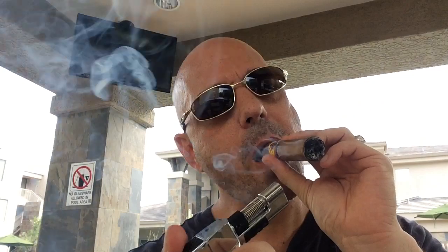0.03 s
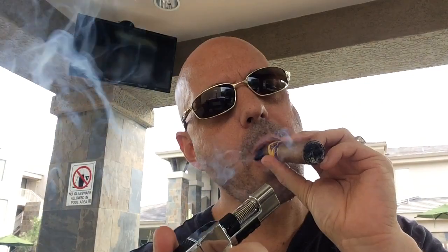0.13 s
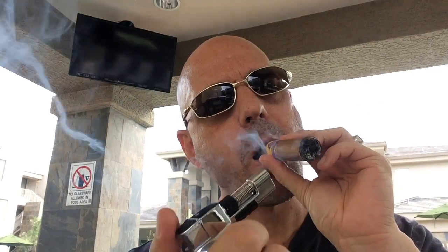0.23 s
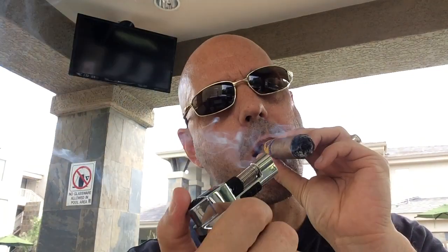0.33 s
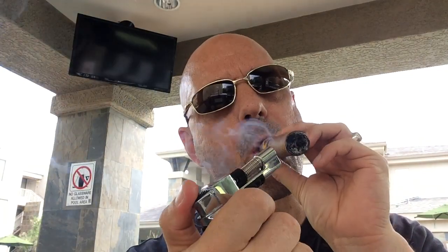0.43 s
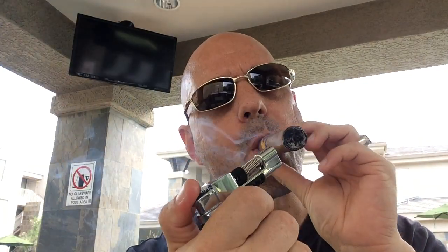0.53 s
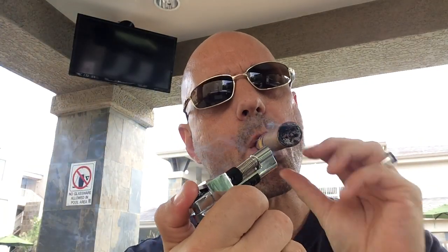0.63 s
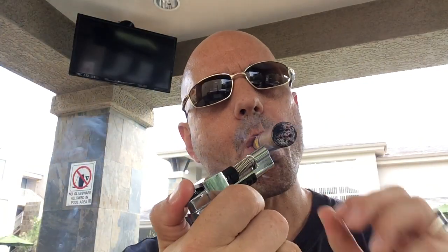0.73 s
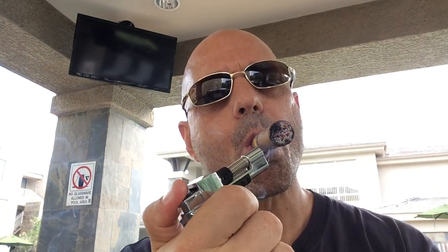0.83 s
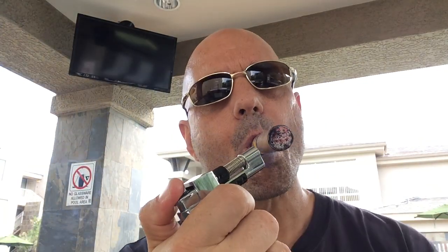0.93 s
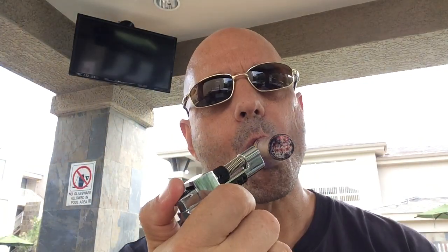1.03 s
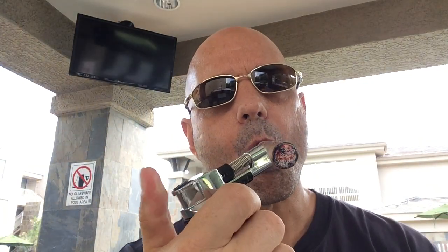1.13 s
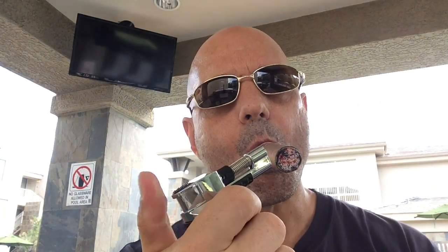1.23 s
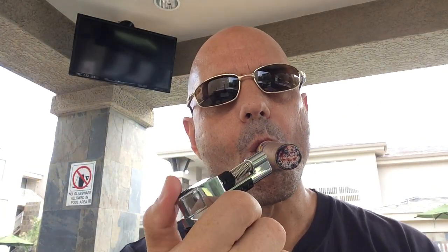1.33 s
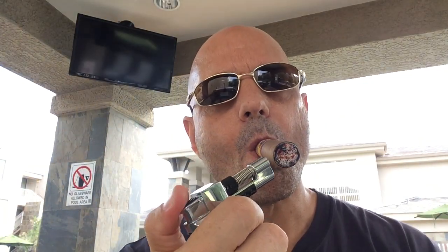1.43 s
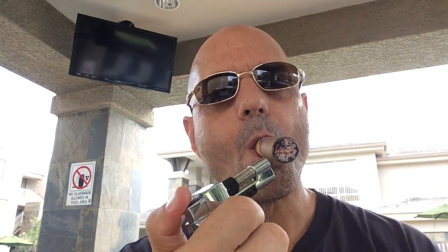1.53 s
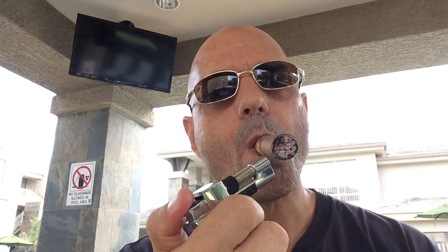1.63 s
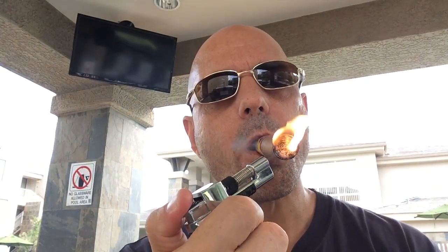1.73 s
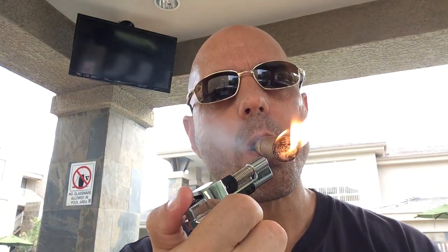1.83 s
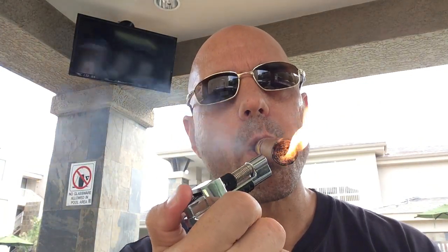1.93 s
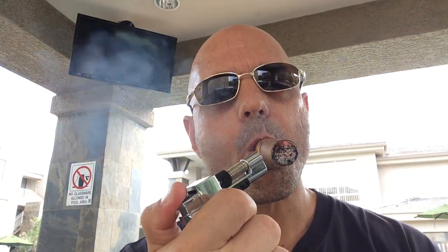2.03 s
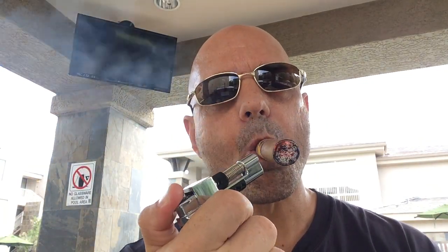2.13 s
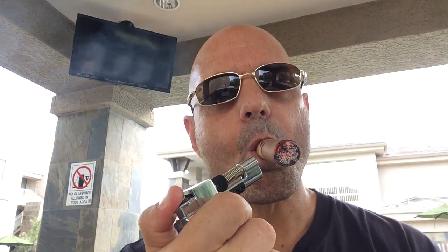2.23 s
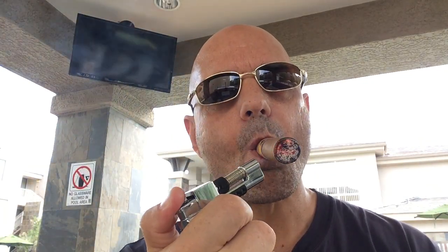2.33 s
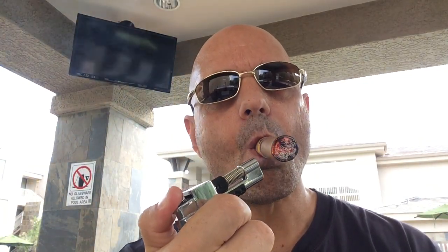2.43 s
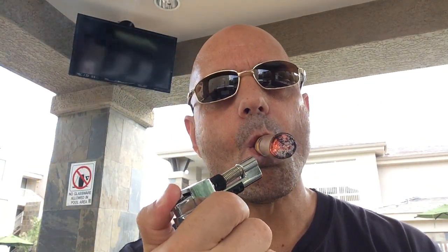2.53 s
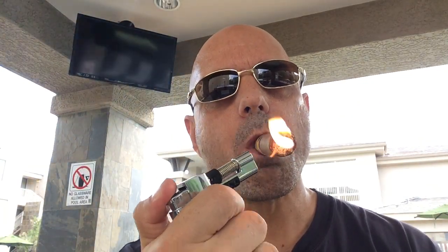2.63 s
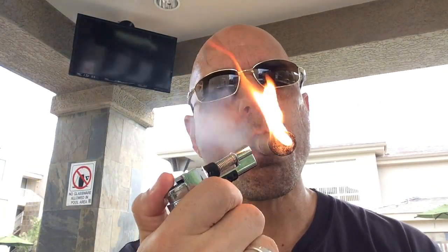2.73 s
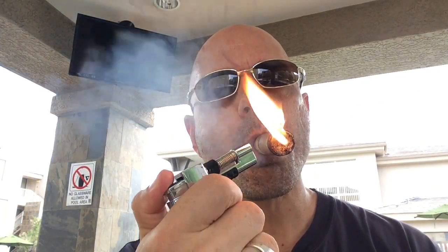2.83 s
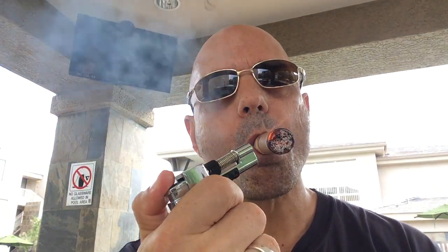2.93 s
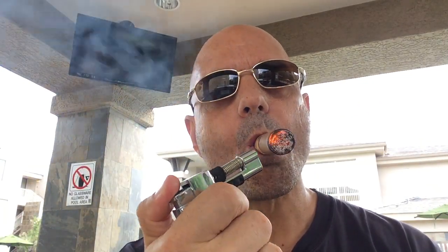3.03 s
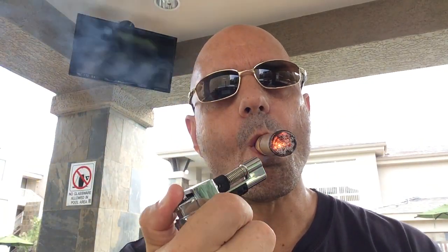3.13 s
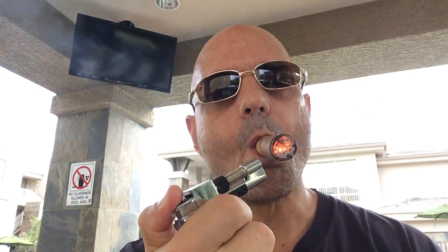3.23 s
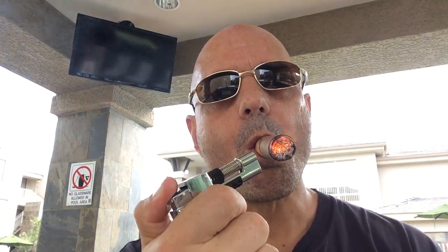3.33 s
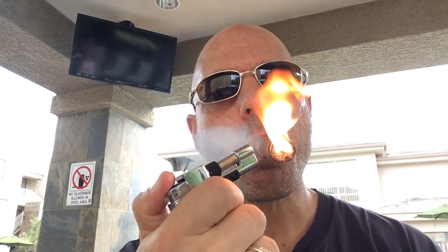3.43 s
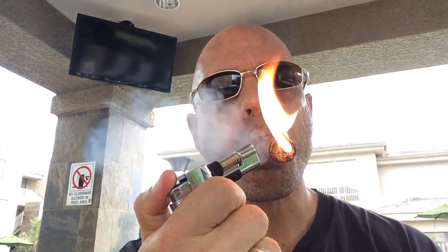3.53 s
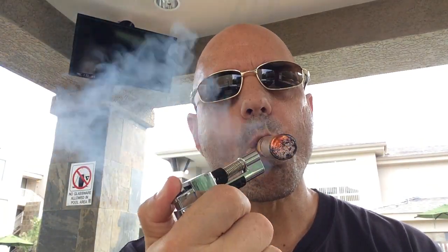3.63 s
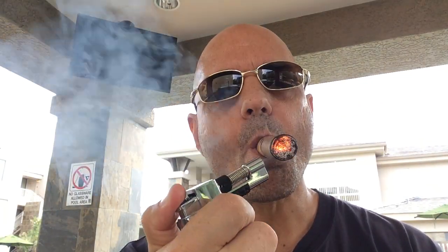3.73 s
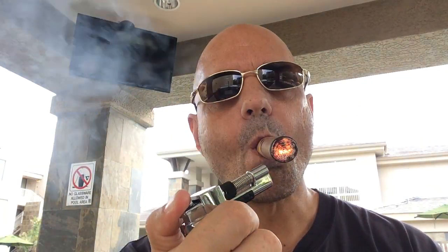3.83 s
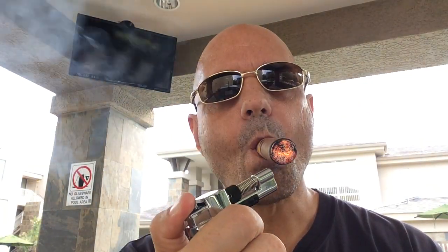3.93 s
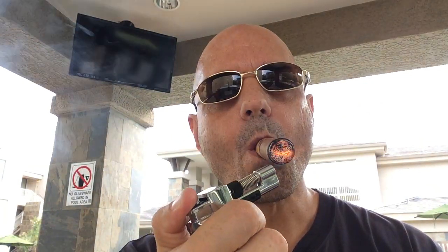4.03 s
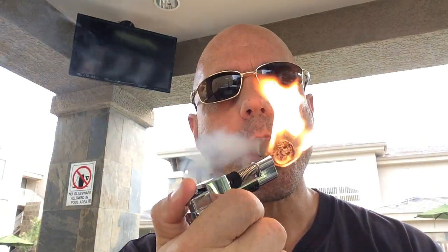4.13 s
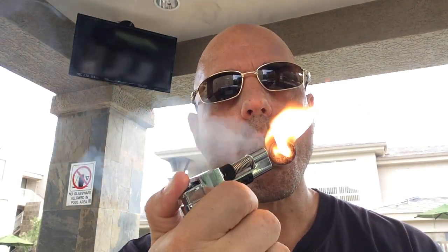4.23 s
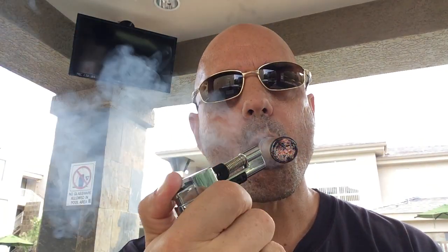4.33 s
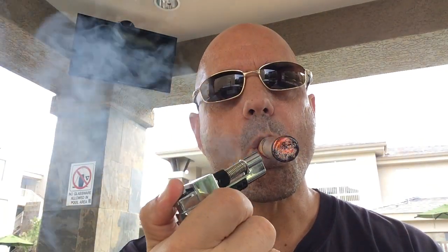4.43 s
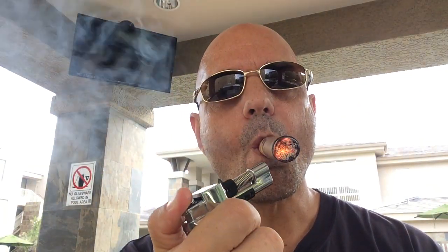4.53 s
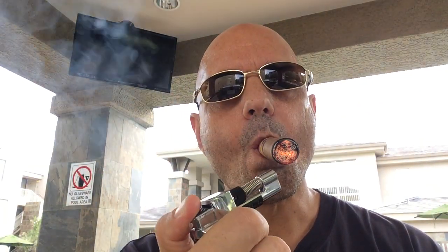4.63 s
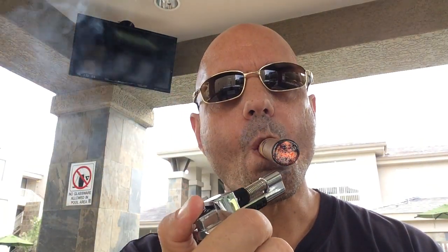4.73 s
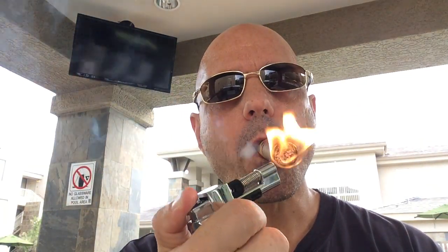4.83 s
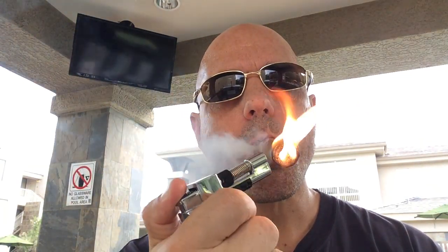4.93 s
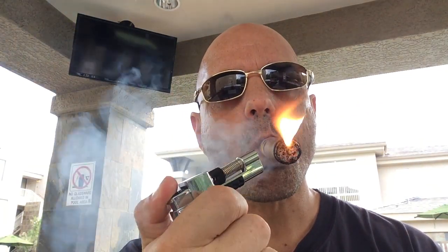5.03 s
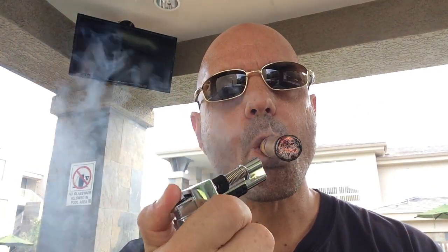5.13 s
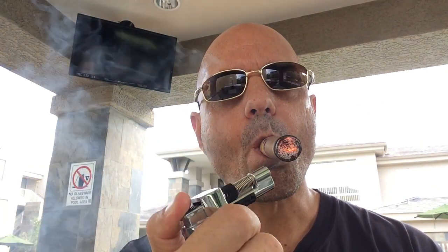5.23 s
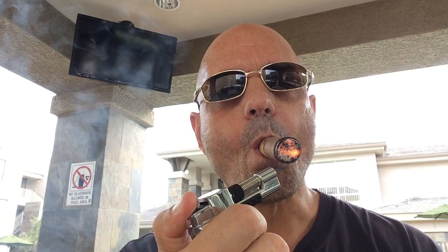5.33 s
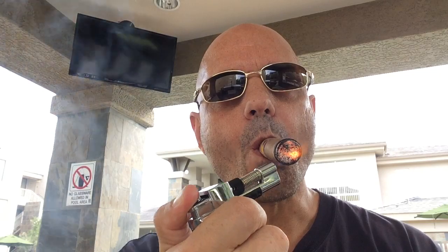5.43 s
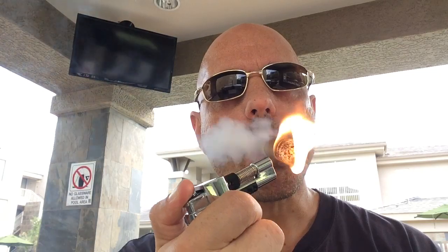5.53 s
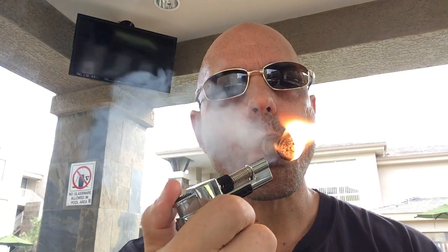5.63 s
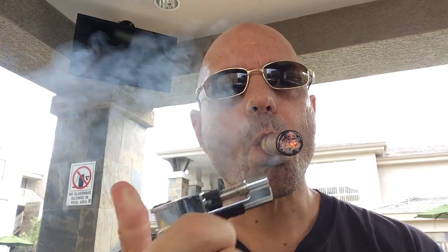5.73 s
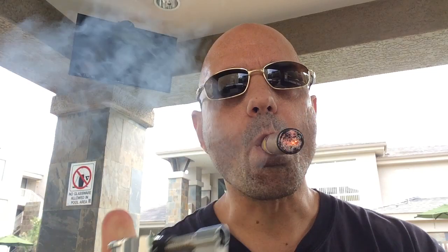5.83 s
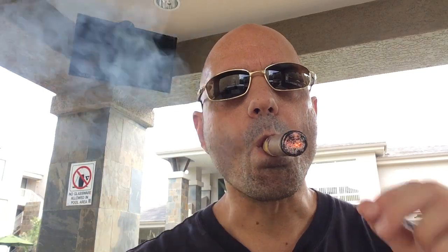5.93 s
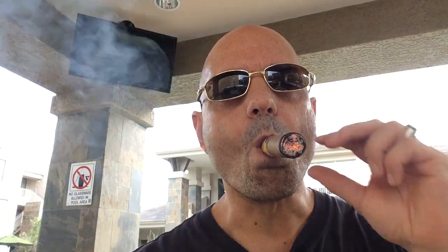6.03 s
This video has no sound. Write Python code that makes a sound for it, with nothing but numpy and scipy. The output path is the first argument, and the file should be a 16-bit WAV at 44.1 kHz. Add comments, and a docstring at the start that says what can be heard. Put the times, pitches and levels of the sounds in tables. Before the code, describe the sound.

Close to the microphone on a covered patio, a butane torch lighter hisses, snaps alight and clacks off after a short try. After a few light ticks it snaps again and burns for about four seconds with a wavering hiss and soft roar. Very deep, soft puffs of air hit the microphone as the cigar flares. A last clack stops the flame, while distant traffic rumbles faintly.

```python
"""Under a patio roof, a butane torch lighter lights a cigar: one short try, then a long burn.
Gas hisses as the trigger goes down, a tiny hammer snaps against a crystal to make the spark,
the flame roars, and the trigger clacks back. Each time the cigar flares up, a slow wave of
air pressure swings the microphone. Behind it, distant traffic rumbles, an engine idles,
a fan hums, and one far motor pulls and eases off."""
import sys
import numpy as np
from scipy import signal
from scipy.fft import rfft, irfft, next_fast_len
from scipy.io import wavfile
from scipy.ndimage import uniform_filter1d, map_coordinates

SR = 44100
rng = np.random.default_rng(int(sys.argv[2]) if len(sys.argv) > 2 else 0)


def dump(signal):
    """Clip the signal to [-1, 1] and save it as 16-bit WAV at the path in sys.argv[1]."""
    limited = np.clip(np.atleast_2d(signal).T, -1, 1)
    pcm = np.round(limited * 32767).astype(np.int16)
    wavfile.write(sys.argv[1], SR, pcm)


N = 268524


def amp(db):
    """Turn decibels into a gain to multiply by."""
    return 10 ** (np.asarray(db) / 20)


def unit(x):
    """Scale a signal to an average strength (rms) of 1."""
    return x / np.sqrt(np.mean(x ** 2) + 1e-20)


def along(points, hz):
    """Read between (frequency, value) points, on a log frequency axis."""
    freqs, values = np.transpose(points)
    return np.interp(np.log(hz + 1), np.log(freqs + 1), values)


def wobble(rate):
    """A smooth curve through `rate` random points a second."""
    return map_coordinates(rng.standard_normal(int(N * rate / SR) + 4), [np.arange(N) * rate / SR])


def swell(s, width):
    """A smooth bump of height 1 around s seconds."""
    return np.exp(-((np.arange(N) / SR - s) / width) ** 2 / 2)


def add(track, s, sound):
    """Mix a sound into the track at s seconds."""
    room = track[round(s * SR):][:len(sound)]
    room += sound[:len(room)]


def filtered(x, response):
    """Scale and delay each frequency in x as response(hz) says."""
    size = next_fast_len(len(x) + SR // 2)
    return irfft(rfft(x, size) * response(np.fft.rfftfreq(size, 1 / SR)), size)[:len(x)]


def rush(spectrum, patchy_db, size=512):
    """Rushing noise with loud and soft patches; a bigger size makes them narrower and slower."""
    frames = signal.stft(rng.standard_normal(N), nperseg=size)[2]
    patches = uniform_filter1d(rng.standard_normal(frames.shape), size=4, axis=0)
    patches = uniform_filter1d(patches, size=8, axis=1)
    noise = signal.istft(frames * amp(patchy_db * unit(patches)), nperseg=size)[1][:N]
    return unit(filtered(noise, lambda hz: amp(along(spectrum, hz))))


def whistle(hz, width_hz):
    """A breathy note: a narrow band of noise whose pitch may move."""
    phase = 2 * np.pi * np.cumsum(hz * np.ones(N)) / SR
    smooth = signal.butter(2, width_hz / 2, fs=SR, output="sos")
    a, b = signal.sosfilt(smooth, rng.standard_normal((2, N)))
    return unit(a * np.cos(phase) + b * np.sin(phase))


# the tone of the deep rumble and of the tyres: (frequency [Hz], relative level [dB])
RUMBLE_TONE = [(20, -2.5), (35, 6), (50, -7.5), (63, -5), (74, 1), (100, -9.5), (120, -6.5), (160, -19),
               (300, -51.5)]
TYRE_TONE = [(80, 0), (120, 0.5), (170, -3.5), (210, -2.5), (340, -1), (450, -4), (650, -7.5),
             (1000, -13.5), (1600, -18.5), (2500, -25), (5000, -30.5), (10000, -37), (15000, -52)]
# engines and tyres droning further off: (time [s], pitch [Hz], level [dB])
DRONE = [(0, 245, -65), (1.6, 238, -69.5), (2.7, 205, -64.5), (3.699, 208, -61), (4.4, 245, -67.5),
         (5.199, 290, -60.5), (6.09, 250, -63)]

def traffic(rumble_db=-50.5, tyres_db=-55.5, rise_db_per_s=.24):
    """Far traffic rumbles and drones; the tyres grow louder as it slowly draws nearer."""
    t = np.arange(N) / SR
    times, drone_hz, drone_db = np.transpose(DRONE)
    rumble = amp(rumble_db + .61 * wobble(2.3)) * rush(RUMBLE_TONE, patchy_db=-1)
    tyre_gain = amp(tyres_db + rise_db_per_s * t + .51 * wobble(2.8))
    tyres = tyre_gain * rush(TYRE_TONE, patchy_db=2, size=4096)
    drone = amp(np.interp(t, times, drone_db)) * whistle(np.interp(t, times, drone_hz), width_hz=43)
    return rumble + tyres + drone


# the idling engine gets louder: (time [s], level [dB], width [s])
IDLE_SWELLS = [(1.62, -52, .26), (2.3, -53, .33), (3.152, -58.5, 0.28), (4.27, -52.5, .22)]

def idling_engine():
    """An engine down the street hums low, swelling and fading."""
    gain = sum(amp(db) * swell(s, width) for s, db, width in IDLE_SWELLS)
    return gain * whistle(hz=73, width_hz=18.3)


def fan():
    """A fan gives a faint steady note over the low hum of its mains power."""
    return amp(-72) * whistle(hz=592, width_hz=9) + amp(-66) * whistle(hz=119, width_hz=8.6)


def motor(pull_s=.93, ease_s=1.27, throttle_s=.03, top_hz=262, climb_hz_per_s=8, sag_hz_per_s=60,
          base_db=-64, pull_db=8.5, fade_db_per_s=5):
    """A far motor's note climbs until the throttle eases, then sags; it is loudest while it pulls."""
    t = np.arange(N) / SR
    before, after = np.maximum(ease_s - t, 0), np.maximum(t - ease_s, 0)
    pitch = top_hz - climb_hz_per_s * before - sag_hz_per_s * after + 2 * wobble(15)
    pull = np.interp(t, [pull_s - throttle_s, pull_s, ease_s, ease_s + throttle_s], [0, 1, 1, 0])
    level_db = base_db + pull_db * pull - fade_db_per_s * np.abs(t - pull_s) + 2 * wobble(11)
    return amp(level_db) * np.sqrt(2) * np.sin(2 * np.pi * np.cumsum(pitch) / SR)


# how long the patio rings: (frequency [Hz], time to fade by 60 dB [s])
PATIO_FADE = [(300, 0.19), (3000, 0.24), (8000, 0.19), (15000, 0.21)]
# echoes off the pillars and roof: (delay [s], relative level [dB])
ECHOES = [(.0075, -38), (0.011, -27.5), (0.015, -25), (0.019, -40.5), (0.0277, -39.5)]
# the tone of a hard click, heard from all sides: (frequency [Hz], relative level [dB])
CLICK_TONE = [(100, -33.5), (600, -18), (1100, -8.5), (1500, 2.5), (2000, -1), (2550, -9.5), (3200, 3.5),
              (5000, -3), (7000, 3), (12000, -1.5), (15000, -6.5)]

def patio(tail_db, echo_db):
    """The patio answers a click with a few hard echoes and a short, blurred tail."""
    hz, t, frames = signal.stft(rng.standard_normal(SR // 2), SR, nperseg=256)
    tail = signal.istft(frames * amp(-60 * t / along(PATIO_FADE, hz)[:, None]), SR, nperseg=256)[1]
    answer = amp(tail_db) * tail / np.linalg.norm(tail)
    for delay, db in ECHOES:
        echo = rng.standard_normal(len(tail)) * amp(-60 * np.arange(len(tail)) / SR / .0067)
        add(answer, delay, amp(db + echo_db) * echo / np.linalg.norm(echo))
    return filtered(answer, lambda hz: amp(along(CLICK_TONE, hz)))


# the cigar flares up, and the nozzle's ring may dip as the torch tilts:
# (time [s], level [dB], width [s], time until collapse [s], pitch dip [Hz])
FLARES = [(1.872, -17.5, .036, .243, 0), (2.787, -7.5, .028, .198, 100), (3.511, -12.5, .028, .179, 0),
          (4.245, -15, .04, .16, 420), (4.982, -11, .028, .168, 480), (5.618, -11.5, .028, .172, 400)]

def flares(collapse_width_s=.057, collapse_db=2.03, lead_widths=2.6, onset_s=.03, leak_hz=.68):
    """Each flare catches suddenly and draws the air away; its slower collapse pushes air back."""
    t, pressure = np.arange(N) / SR, np.zeros(N)
    for s, db, width, life, _ in FLARES:
        caught = np.sin(np.pi / 2 * np.clip((t - s + lead_widths * width) / onset_s, 0, 1)) ** 2
        collapse = amp(collapse_db) * width / collapse_width_s * swell(s + life, collapse_width_s)
        pressure += amp(db) * caught * (collapse - swell(s, width))
    pressure *= 1 + amp(-36) * wobble(67)  # a slight flutter
    # the microphone lets steady pressure leak away
    return filtered(pressure, lambda hz: 1j * hz / (leak_hz + 1j * hz))


def strike(notes, rattle_s, rattle_db):
    """One hard hit and its dying rattle make a part ring at its own notes."""
    t = np.arange(SR // 2) / SR
    rattle = rng.standard_normal(len(t)) * amp(-60 * t / rattle_s)
    force = amp(rattle_db) * rattle / np.linalg.norm(rattle)
    force[0] = 1  # the hit itself
    # so short a contact holds all frequencies evenly
    force = irfft(np.exp(1j * np.angle(rfft(force))), len(t))
    force *= np.exp(-(2 * t / rattle_s) ** 2)

    def body(hz):
        return sum((-1) ** k * amp(db) * 1j * hz * width / (pitch ** 2 - hz ** 2 + 1j * hz * width)
                   for k, (pitch, width, db) in enumerate(notes))

    ring = filtered(force, body)
    return ring / np.linalg.norm(ring)


# the notes of the trigger hitting its stop: (pitch [Hz], width [Hz], relative level [dB])
TRIGGER_NOTES = [(716, 380, -16), (1150, 250, -19.5), (1410, 590, -6), (1970, 500, -5.5), (3170, 810, -8.5),
                 (4300, 630, -7.5), (5990, 420, 4.5), (6870, 200, -35), (7850, 160, -2.5),
                 (9880, 360, -3.5), (11140, 350, 4.5), (12300, 300, -9), (12800, 430, -12)]
# the spring's faint ring: (pitch [Hz], relative level [dB], time to fade by 60 dB [s])
SPRING_NOTES = [(8170, -43, .21), (11080, -41, .08)]
# the trigger springs back or is touched:
# (time [s], relative level [dB], rattle length [s], low cutoff [Hz])
CLACKS = [(0.4786, -53, .02, 4500), (1.1668, -50, 0.011, 2970), (1.1965, -8.5, 0.011, 452),
          (1.3729, -24, .013, 4500), (1.383, -36.5, 0.017, 1990), (1.4050, -42, 0.014, 2030),
          (1.4570, -55, 0.021, 4500), (1.6467, -37, .005, 4500), (3.054, -50, .012, 1970),
          (5.715, -46, .012, 2000), (5.753, -9, 0.014, 780)]

def trigger(gain_db=9, full_shake_s=.017):
    """The trigger meets its stop and shakes its spring; light touches stir only the high notes."""
    out, t = np.zeros(N), np.arange(SR // 2) / SR
    spring = sum(amp(db - 60 * t / fade_s) * np.sin(2 * np.pi * hz * t)
                 for hz, db, fade_s in SPRING_NOTES)
    for s, db, rattle_s, low_hz in CLACKS:
        clack = strike(TRIGGER_NOTES, rattle_s, rattle_db=6)
        add(clack, 0, patio(tail_db=-19.5, echo_db=.5))
        clack = signal.sosfilt(signal.butter(4, low_hz, "high", fs=SR, output="sos"), clack)
        shake = min(rattle_s / full_shake_s, 1) ** 2  # a short rattle barely stirs the spring
        add(out, s, amp(db + gain_db) * clack + amp(db) * shake * spring)
    return out


# the notes of the lighter's case: (pitch [Hz], width [Hz], relative level [dB])
CASE_NOTES = [(690, 140, -19.5), (1600, 260, -6.5), (3390, 280, 3), (4465, 410, -1.5), (6430, 410, .7),
              (7100, 310, -3), (8970, 540, -3.5), (10600, 450, -1), (11900, 550, -2), (11700, 290, -3.5),
              (12810, 690, 0)]
# the hammer snaps: (time [s], relative level [dB], rattle length [s], knock level [dB])
SNAPS = [(0.699, -3, 0.0088, -37.5), (1.649, -3, 0.0044, -32)]

def hammer(gain_db=9, knock_hz=140, knock_fade_s=.029):
    """The hammer hits the spark crystal, rings the case and knocks it against the hand."""
    out, t = np.zeros(N), np.arange(SR // 4) / SR
    for s, db, rattle_s, knock_db in SNAPS:
        add(out, s, amp(db + gain_db) * strike(CASE_NOTES, rattle_s, rattle_db=1))
        add(out, s, amp(db + gain_db) * patio(tail_db=-17, echo_db=2))
        add(out, s, amp(knock_db - 60 * t / knock_fade_s) * np.sin(2 * np.pi * knock_hz * t))
    return out


# the tone of rushing gas: (frequency [Hz], relative level [dB])
HISS_TONE = [(1200, -29), (2600, -8), (4000, -8), (5000, -11), (6300, -11.5), (8200, -12.5), (9800, -8),
             (10400, -3.5), (11100, -3), (12200, -5.5), (13000, -8), (13700, -10.5), (14200, -23)]

def gas_hiss(flow, ring_hz=9070, barrel_hz=4620, nozzle_hz=10700, tilt_width_s=.097):
    """Gas hisses, and sings in the nozzle and barrel; tilting lowers the ring and softens the hiss."""
    warming_db = 1.4 * np.arange(N) / SR  # the nozzle sings louder as the torch warms up
    dip_hz = sum(depth_hz * swell(s, tilt_width_s) for s, *_, depth_hz in FLARES)
    ring = amp(-7 + .95 * wobble(5)) * whistle(ring_hz - dip_hz, width_hz=530)
    barrel = amp(-9.5 + 1.2 * wobble(4.5)) * whistle(barrel_hz, width_hz=260)
    nozzle = amp(-9 + warming_db + .8 * wobble(5.5)) * whistle(nozzle_hz, width_hz=660)
    hiss = rush(HISS_TONE, patchy_db=-.5, size=1024)
    return amp(-2.5 + .51 * flow - .002 * dip_hz) * (hiss + ring + barrel + nozzle)


# the tone of the flame: (frequency [Hz], relative level [dB])
ROAR_TONE = [(100, -13.5), (300, -3), (420, -2.5), (600, 3), (950, -0.5), (1400, 2.5), (1900, -2.5),
             (2200, -6), (2500, -30), (4000, -22)]

def flame_roar(flow):
    """The swirling jet of flame roars lower than the hiss and flickers quickly."""
    return amp(.53 * flow + .77 * wobble(40)) * rush(ROAR_TONE, patchy_db=2, size=4096)


def held(start, stop, rise_s, weak_db, settle_s=.45, shut_db_per_s=400):
    """The gain of a flow that starts weak, settles, and dies as the valve springs shut."""
    t = np.arange(N) / SR
    age, since_shut = np.maximum(t - start, 0), np.maximum(t - stop, 0)
    opening = np.minimum(age / rise_s, 1)
    return opening * amp(-weak_db * np.exp(-age / settle_s) - shut_db_per_s * since_shut)


# the trigger is held down, once for each snap:
# (gas opens [s], gas shuts [s], base hiss level [dB], base roar level [dB])
BURNS = [(0.52, 1.19, -67, -64), (1.488, 5.77, -65, -61)]

def torch():
    """The thumb opens the gas and the snap lights it; hiss and roar waver with the same flow."""
    gas = sum(amp(db) * held(start, stop, rise_s=.085, weak_db=4) for start, stop, db, _ in BURNS)
    flame = sum(amp(db) * held(spark, stop, rise_s=.015, weak_db=6)
                for (spark, *_), (_, stop, _, db) in zip(SNAPS, BURNS))
    flow = wobble(8.6)
    return gas * gas_hiss(flow) + flame * flame_roar(flow)


def scene():
    """The lighter and cigar close by, the street far off, in one channel."""
    close = hammer() + trigger() + torch() + flares()
    far = traffic() + idling_engine() + fan() + motor()
    return (close + far)[None]


def record(dry):
    """The microphone cuts off the very highest sounds."""
    top_hz = 15400
    return signal.sosfilt(signal.ellip(10, .1, 80, top_hz, fs=SR, output="sos"), dry)


dry = scene()
out = record(dry)
dump(out)
```